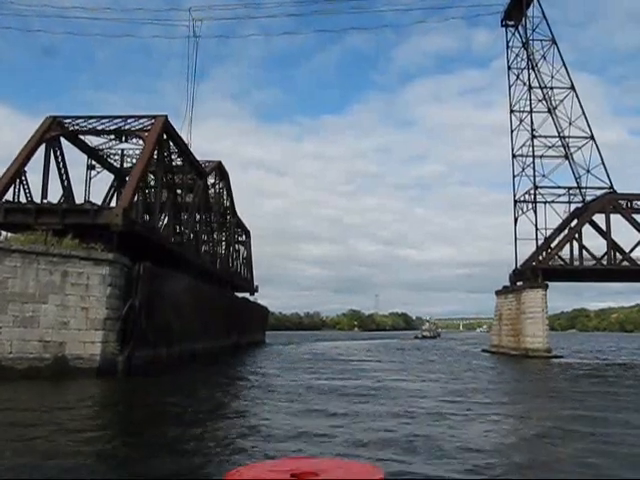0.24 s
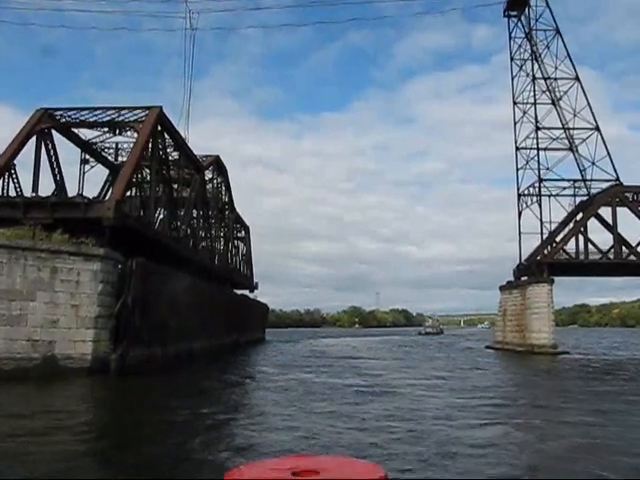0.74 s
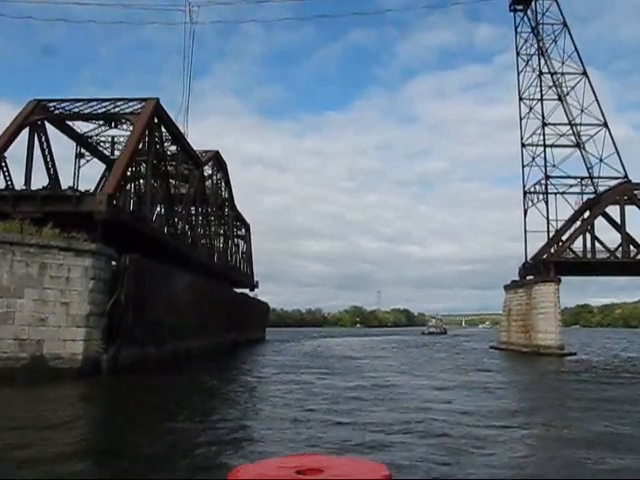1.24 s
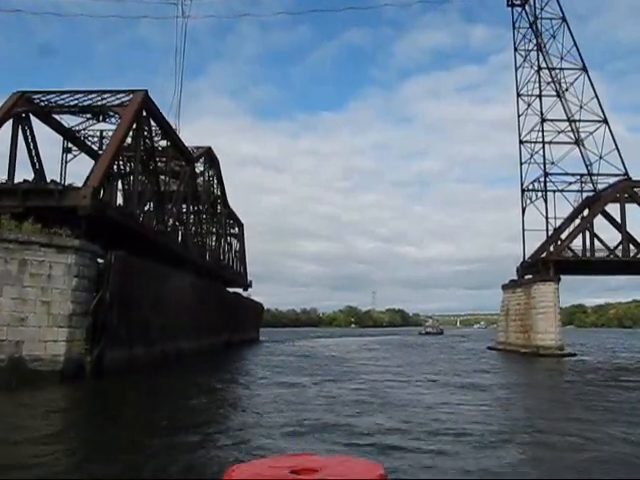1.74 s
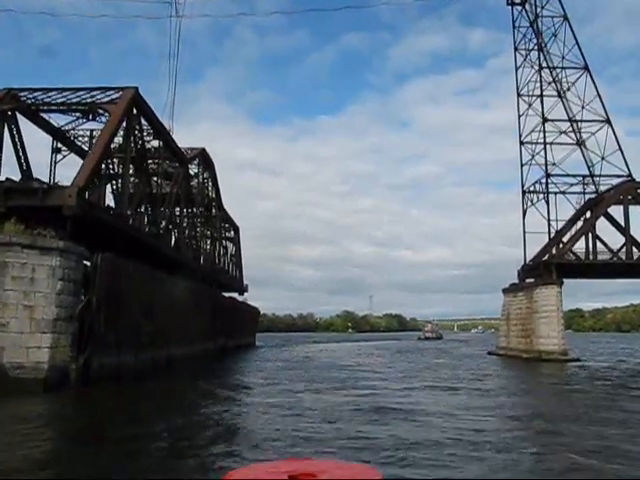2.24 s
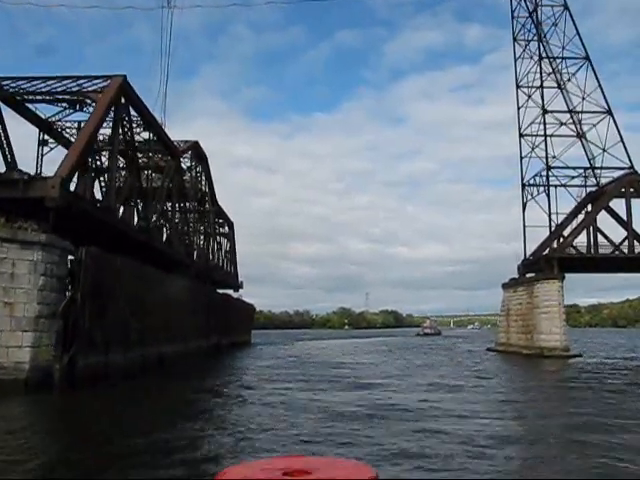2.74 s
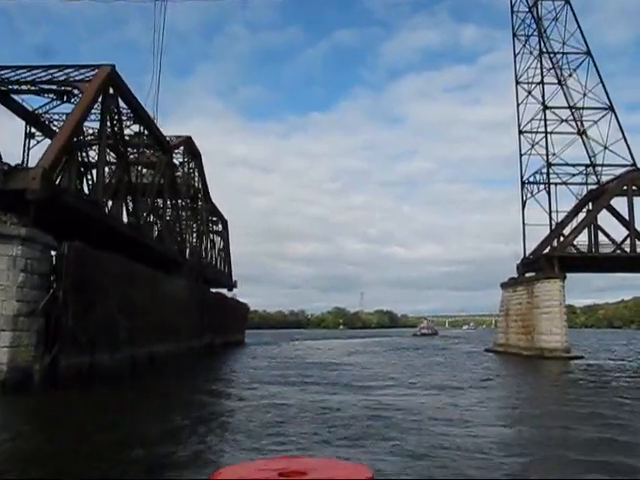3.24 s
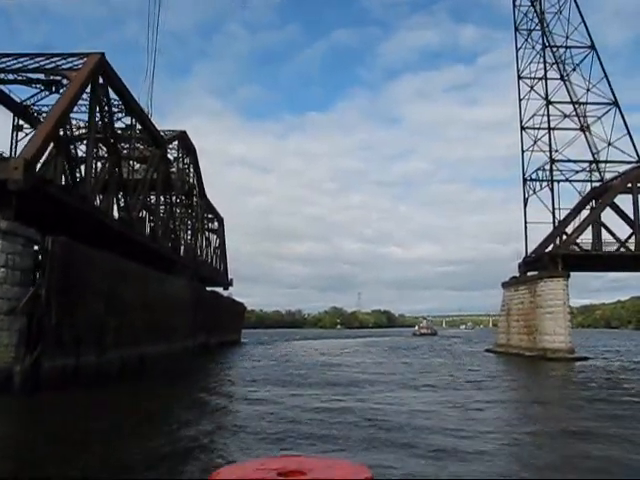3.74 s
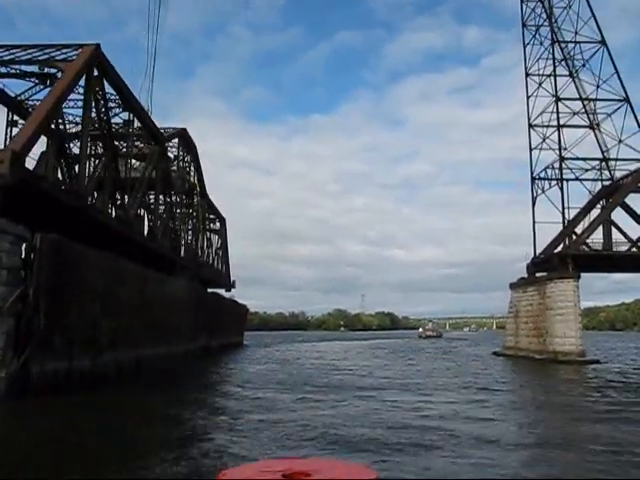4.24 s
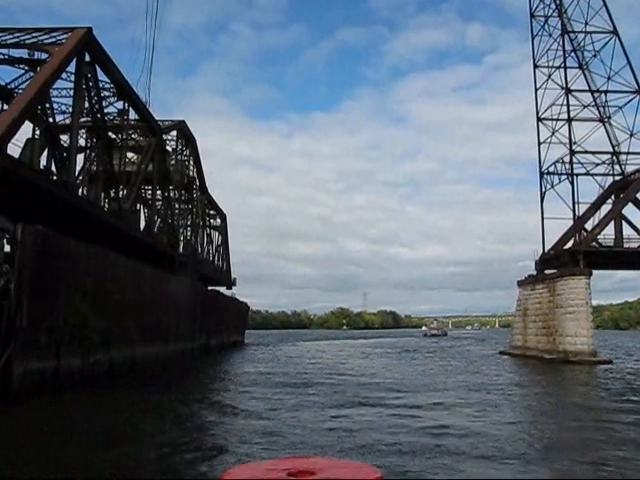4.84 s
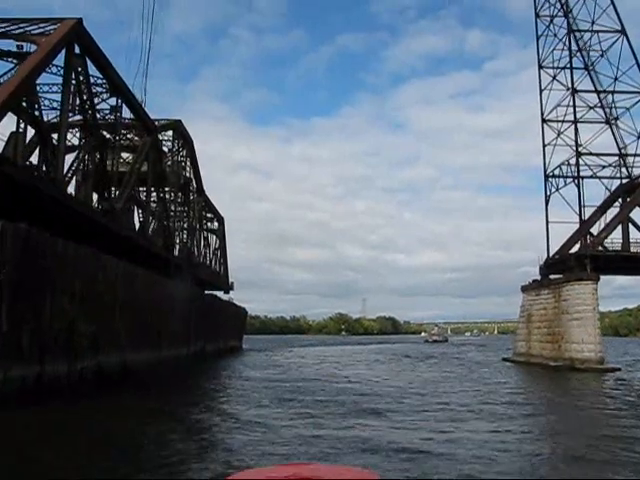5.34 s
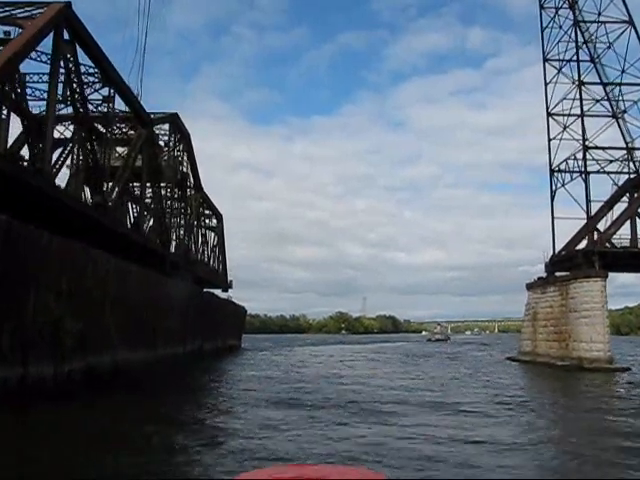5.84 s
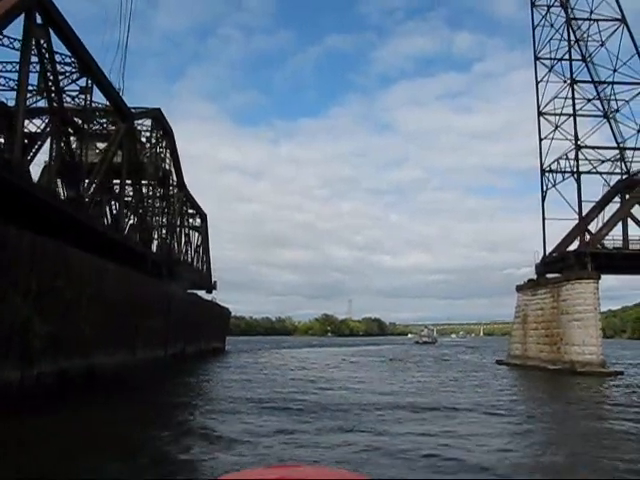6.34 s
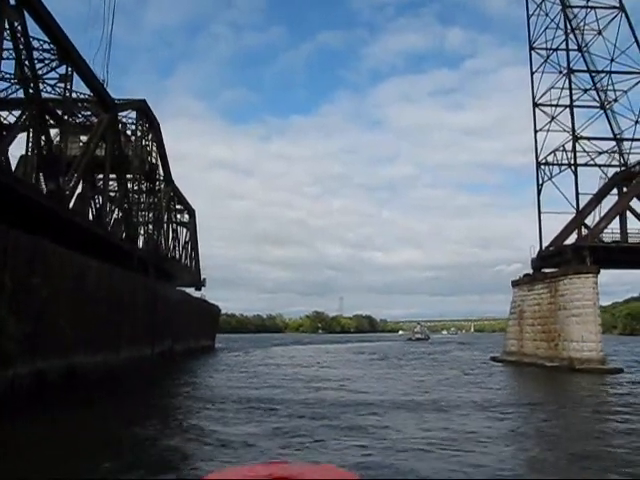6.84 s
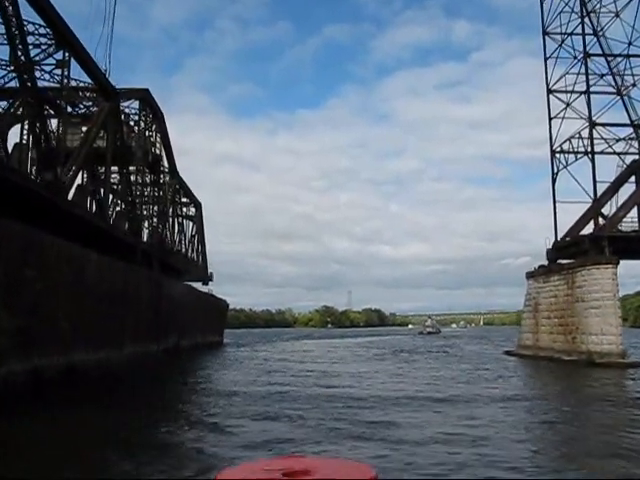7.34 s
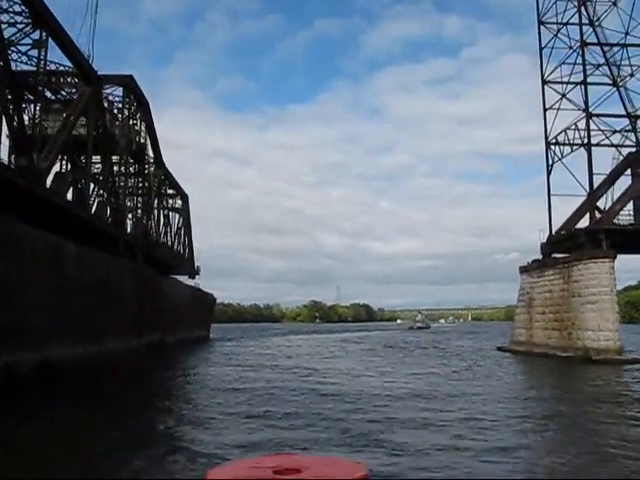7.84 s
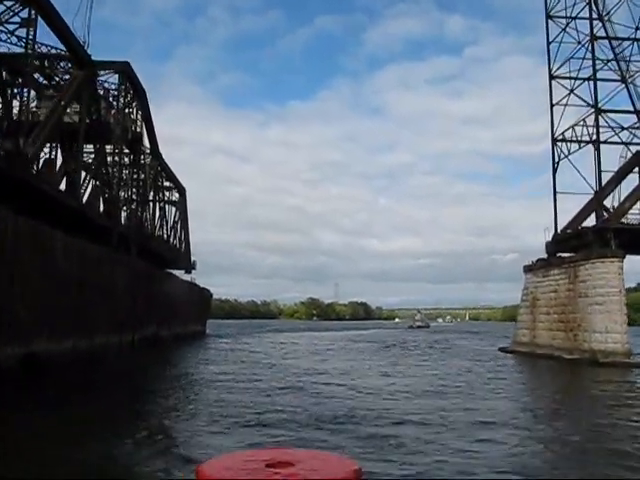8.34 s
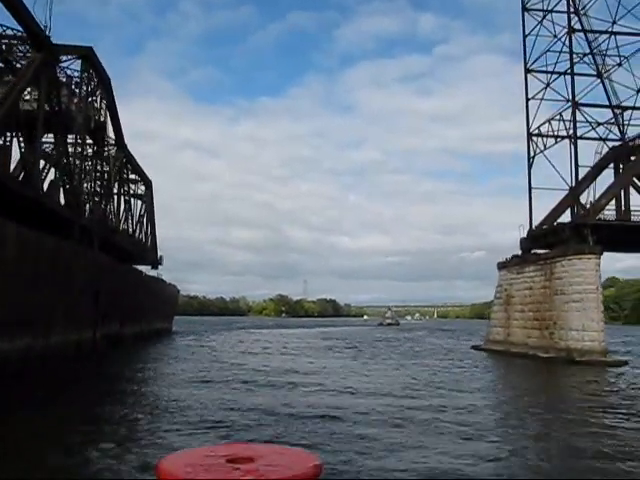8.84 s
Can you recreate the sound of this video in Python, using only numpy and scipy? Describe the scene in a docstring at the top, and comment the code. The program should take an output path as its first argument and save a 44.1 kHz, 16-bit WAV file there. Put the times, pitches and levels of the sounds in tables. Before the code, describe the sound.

Wind roars on a microphone at the bow of a moving boat for the whole nine seconds, low and blustery with a thin fizz in the treble. Gusts swell and break away abruptly, often several times a second. Beneath them the engine and hull make a low, throbbing rumble, and water washes faintly and evenly along the bow. Irregular thumps hit the microphone right at the start and again from about 1 to 2.3 seconds, with a sharp crackle near 1.8 seconds. From about 3 to 7 seconds the air is choppier, and the thumps come thick and fast with short rasps and crackles, densest from 4 seconds on. After about 7.3 seconds the buffeting thins out to scattered thumps, while stronger gusts rise near 7.7 and 8.1 seconds. The wind and rumble carry on to the end.

```python
"""Gusting wind roars on a camera at the bow of a moving boat, over a rumble of engine and hull and a faint
wash of water. The gusts build and break away from the housing. Eddies thump the microphone port and the
sharpest ones crackle, most of all beside a bridge pier. A sample-and-hold at a quarter of the rate
mirrors the roar into a thin fizz in the treble."""
import sys
import numpy as np
from scipy import signal
from scipy.fft import rfft, irfft
from scipy.io import wavfile

SR = 44100
rng = np.random.default_rng(int(sys.argv[2]) if len(sys.argv) > 2 else 0)


def persist_wave(psi):
    """Save psi, clipped to +-1, as 16-bit WAV."""
    counts = np.round(np.clip(psi, -1, 1) * 32767).astype(np.int16)
    wavfile.write(sys.argv[1], SR, np.atleast_2d(counts).T)


N = 401310
TIME = np.arange(N) / SR


def amp(db):
    """Decibels to gain."""
    return 10 ** (np.asarray(db) / 20)


def unit_rms(x):
    """Scales to rms 1."""
    return x / np.sqrt(np.mean(x ** 2) + 1e-20)


def curve(table, at_s=TIME):
    """Linear interpolation of (seconds, value) rows."""
    return np.interp(at_s, *np.transpose(table))


def smooth(x, span_s):
    """Running mean under a Hann window."""
    window = signal.windows.hann(int(span_s * SR))
    return signal.fftconvolve(x, window / window.sum(), "same")


def colour(x, spectrum):
    """Filters x by (Hz, dB) rows, joined on a log frequency axis."""
    hz, db = np.transpose(spectrum)
    bins_hz = np.fft.rfftfreq(len(x), 1 / SR)
    gain_db = np.interp(np.log(bins_hz + 1), np.log(hz), db)
    return irfft(rfft(x) * amp(gain_db), len(x))


def low_pass(x, hz):
    """Steep FIR low-pass."""
    return signal.oaconvolve(x, signal.firwin(511, hz, window=("kaiser", 9), fs=SR), "same")


def flutter(rate_hz):
    """Random wavering of rms 1, rolled off above rate_hz."""
    bins_hz = np.fft.rfftfreq(N, 1 / SR)
    return unit_rms(irfft(rfft(rng.standard_normal(N)) / (1 + (bins_hz / rate_hz) ** 2), N))


def steady_noise(spectrum, span_s):
    """Coloured noise, levelled over spans longer than span_s."""
    noise = colour(rng.standard_normal(N), spectrum)
    return noise / np.sqrt(smooth(noise ** 2, span_s) + 1e-12)


def burst(spectrum, pitch_ratio, length_s, spikiness, samples=8192):
    """Noise under a Gaussian envelope; spikiness above 1 breaks it into snaps."""
    t = (np.arange(samples) - samples // 2) / SR
    envelope = np.exp(-.5 * (2 * t / max(length_s, .001)) ** 2)
    noise = rng.standard_normal(samples)
    spikes = np.sign(noise) * abs(noise) ** spikiness
    swings = colour(spikes * envelope, [(hz * pitch_ratio, db) for hz, db in spectrum])
    return unit_rms(swings) * np.sqrt(np.mean(envelope ** 2))


def add_centred(mix, centre_s, sound):
    """Mixes a sound in around centre_s."""
    at = round(centre_s * SR) - len(sound) // 2 + np.arange(len(sound))
    inside = (at >= 0) & (at < N)
    mix[at[inside]] += sound[inside]


# Each row: breakaway time in seconds, relative peak level in dB, build-up in seconds.
GUST_PEAKS = [(0.55, -40, .35), (0.975, -38, 0.49), (1.28, -42.5, 0.29), (1.57, -37, 0.16),
              (1.81, -39.5, 0.35), (2.06, -41.5, 0.2), (2.31, -43, 0.2), (2.9, -38, 0.43),
              (3.12, -38.5, 0.35), (3.7, -39, 0.26), (3.85, -42.5, 0.086), (4.03, -41.5, 0.14),
              (4.26, -43.5, 0.35), (4.49, -42, 0.06), (4.84, -41, 0.12), (5.37, -39, 0.18),
              (5.58, -39.5, 0.15), (6.32, -45.5, 0.67), (7.17, -41.5, 0.67), (7.68, -36, 0.1),
              (8.141, -37.5, 0.58), (8.47, -39, 0.23), (9.02, -39.5, .45)]


def gusts(lull_db=-47.5, usual_db=-41, build_db=5.5, fall_db_per_s=249):
    """Gusts build on a steady headwind, then break away. Returns dB above the usual flow."""
    power = amp(lull_db) ** 2
    for break_s, peak_db, build_s in GUST_PEAKS:
        before_s = np.maximum(break_s - TIME, 0)
        after_s = np.maximum(TIME - break_s, 0)
        power += amp(peak_db - build_db * (before_s / build_s) ** 2 - fall_db_per_s * after_s) ** 2
    return 10 * np.log10(power) - usual_db


# Housing resonances. Each row: frequency in Hz, relative level in dB.
ROAR_SPECTRUM = [(40, -17.5), (150, 1), (240, -0.5), (290, 2.5), (365, -7.5), (520, -6.5), (750, -10.5),
                 (1050, -16), (1430, -15), (1750, -21), (2600, -28), (3600, -33.5), (5400, -37.5)]


def airflow(gust_db, level_db=-26.0, flutter_db=0.88, brightening=0.041):
    """The stream roars through the housing's broad resonances, brighter as it speeds up."""
    roar = steady_noise(ROAR_SPECTRUM, span_s=0.059)
    body = low_pass(roar, hz=900)
    rush = (roar - body) * amp(brightening * gust_db)
    return (body + rush) * amp(gust_db + level_db + flutter_db * flutter(rate_hz=35))


# Low bluster. Each row: frequency in Hz, relative level in dB.
BLUSTER_SPECTRUM = [(8, -12), (28, -18), (45, -6), (70, 0.5), (115, 2), (190, 5), (290, -5.5), (420, -6.5),
                    (800, -24.5), (2000, -36), (5400, -54)]


def turbulence(gust_db, thumps, level_db=-29.0, follow=1.23, cap_db=3, wake_db=-4.0, flutter_db=3.5):
    """Large slow eddies bluster, growing with the gusts up to a cap and welling up around each thump."""
    stream = amp(level_db + follow * np.minimum(gust_db, cap_db))
    wake = amp(wake_db) * np.sqrt(abs(smooth(thumps ** 2, span_s=0.096)))
    bluster = steady_noise(BLUSTER_SPECTRUM, span_s=0.06)
    return bluster * np.hypot(stream, wake) * amp(flutter_db * flutter(rate_hz=25))


# Hull resonances. Each row: frequency in Hz, relative level in dB.
HULL_SPECTRUM = [(25, -15), (44, -0.5), (53, -8), (60, -0.5), (68, 4.5), (78, -8), (110, -8.5),
                 (300, -59.5)]
# Hull rumble. Each row: time in seconds, level in dB before gusts and throb.
RUMBLE_LEVELS = [(0.0, -15), (0.15, -27.0), (0.4, -23), (2.0, -24), (2.15, -28.5), (2.4, -22), (2.5, -35),
                 (2.6, -22.5), (3.9, -25), (4.05, -19.5), (4.2, -27), (4.45, -22.5), (5.1, -20),
                 (5.2, -31.5), (5.3, -23), (6.25, -24.5), (8.05, -21.5), (8.25, -31.5), (8.35, -21.5),
                 (9.09, -27)]


def hull_rumble(gust_db, follow=0.74, throb_db=1.1):
    """Engine and water drum in the hull: a narrow, throbbing rumble that swells with the gusts."""
    rumble = steady_noise(HULL_SPECTRUM, span_s=0.12)
    return rumble * amp(curve(RUMBLE_LEVELS) + follow * gust_db + throb_db * flutter(rate_hz=8))


def bow_wash(level_db=-48):
    """Water washes faintly and evenly along the bow."""
    spectrum_hz_db = [(100, 5.5), (1000, 0), (2500, -7.5), (5400, -7.5), (8000, -30)]
    return amp(level_db) * unit_rms(colour(rng.standard_normal(N), spectrum_hz_db))


# One eddy's thump. Each row: frequency in Hz before pitch shift, relative level in dB.
EDDY_SPECTRUM = [(15, -21), (70, -1), (170, -0.5), (300, -1), (500, -6), (780, -12.5), (1200, -23),
                 (2000, -41), (3800, -44.5), (5400, -86)]


def eddy(length_s, hardness, usual_s=0.013):
    """A few rough swings of pressure; small or hard eddies sound higher."""
    pitch_ratio = hardness * (usual_s / length_s) ** 0.21
    return burst(EDDY_SPECTRUM, pitch_ratio, 0.85 * length_s, spikiness=2.28)


# Choppy air. Each row: time in seconds, small eddies per second at full flow.
CHOP_RATES = [(0, 4.4), (2.9, 2.87), (4.1, 18.6), (6.8, 22), (7.3, 3), (9.1, 4.7)]


def choppiness(at_s=TIME, usual_per_s=8):
    """Small-eddy rate over its usual value; highest alongside the pier."""
    return curve(CHOP_RATES, at_s) / usual_per_s


# Each row: centre time in seconds, relative level in dB, nominal length in seconds.
STRONG_EDDIES = [(0.017, -21, 0.027), (0.06, -16, 0.017), (0.166, -18.5, 0.025), (0.215, -15.5, 0.022),
                 (0.985, -20, 0.025), (1.124, -19, 0.022), (1.202, -15, 0.01), (1.252, -17.5, 0.032),
                 (1.287, -17, 0.015), (1.58, -19, 0.0056), (1.659, -13, .012), (1.818, -17, 0.019),
                 (1.854, -11, 0.0077), (1.998, -17.5, 0.015), (2.052, -15, 0.032), (2.312, -10, 0.0043),
                 (2.919, -19, 0.016), (2.956, -20, 0.01), (3.13, -14.5, 0.015), (3.219, -16, 0.0099),
                 (3.263, -14, .0065), (3.331, -17.5, .009), (3.432, -18, 0.0061), (3.461, -16, 0.005),
                 (3.486, -17, 0.017), (3.576, -22.5, 0.065), (3.635, -20, 0.028), (3.674, -16.5, 0.018),
                 (3.708, -17, 0.0036), (3.848, -26, 0.029), (3.874, -17, 0.011), (4.042, -17.5, .02),
                 (4.08, -21, 0.02), (4.157, -12.5, .008), (4.213, -19.5, .015), (4.268, -13.5, 0.0062),
                 (4.498, -18, 0.032), (4.572, -14, 0.022), (4.703, -17, 0.012), (4.772, -19, 0.013),
                 (4.8, -21, 0.024), (4.832, -17.5, 0.025), (4.875, -15, 0.011), (4.941, -15, 0.011),
                 (5.047, -18.5, 0.032), (5.362, -15, 0.0093), (5.5, -20, 0.011), (5.59, -14.5, 0.0098),
                 (5.652, -18, 0.019), (5.685, -16, 0.0075), (5.794, -16.5, 0.021), (5.891, -13.5, 0.0065),
                 (5.92, -17, 0.011), (6.043, -18, 0.0089), (6.072, -18, 0.0084), (6.118, -18, 0.034),
                 (6.254, -16.5, 0.018), (6.324, -19.5, .012), (6.337, -13.5, 0.006), (6.481, -17.5, 0.019),
                 (6.589, -13.5, 0.005), (6.617, -18, .016), (6.662, -19, 0.014), (6.783, -19.5, 0.038),
                 (6.966, -17, 0.026), (7.035, -19, 0.016), (7.078, -14.5, 0.0048), (7.123, -19, 0.026),
                 (7.16, -14.5, 0.012), (7.335, -21.5, 0.029), (7.712, -15.5, 0.014), (7.75, -20, 0.012),
                 (7.862, -16.5, 0.007), (8.143, -15.5, 0.014), (8.548, -12, 0.0054), (8.726, -18.5, 0.033),
                 (8.873, -20, 0.037), (9.02, -13.5, 0.0077)]


def buffets(gain_db=1):
    """Strong eddies thump the port, harder in choppy air."""
    out = np.zeros(N)
    for centre_s, db, length_s in STRONG_EDDIES:
        hardness = choppiness(centre_s) ** 0.042
        add_centred(out, centre_s, amp(db + gain_db) * eddy(length_s, hardness))
    return out


# Air tearing at the port. Each row: frequency in Hz before any pitch shift, relative level in dB.
PORT_SPECTRUM = [(200, 11.5), (900, 17.5), (1600, 11), (2400, 5.5), (3000, 10), (3800, 4), (4600, -1),
                 (5400, -7.5)]


def rasp(pressure, level_db=-32, full_swing=0.23, ragged_db=5):
    """Air rasps in the port at the crest of each large pressure swing, louder in choppy air."""
    hiss = colour(rng.standard_normal(N), PORT_SPECTRUM)
    spits = unit_rms(hiss * amp(ragged_db * np.minimum(flutter(rate_hz=200), 2)))
    crests = np.tanh(abs(pressure) / full_swing) ** 3.1
    return amp(level_db) * spits * crests * choppiness() ** .35


def crackle(length_s, hz, usual_hz=2950):
    """An eddy tears at the port's edge: a tight cluster of uneven snaps."""
    return burst(PORT_SPECTRUM, hz / usual_hz, 0.58 * length_s, spikiness=3.3)


def spatter(gain_db=-22.5, scatter_s=0.015, spread_db=2):
    """In choppy air a strong eddy breaks into a few faint spits around its thump."""
    out = np.zeros(N)
    for centre_s, db, _ in STRONG_EDDIES:
        count = rng.poisson(.13 * curve(CHOP_RATES, centre_s))
        for lag, size in rng.standard_normal((count, 2)):
            spit = amp(db + gain_db + spread_db * size) * crackle(length_s=0.0059, hz=2900)
            add_centred(out, centre_s + scatter_s * lag, spit)
    return out


def stalls(depth_db=2.5, half_width_s=0.031, lag_s=0.045):
    """The stream lets go in the lee of each strong eddy. Returns the dip in dB."""
    dip = np.zeros(N)
    window = signal.windows.hann(int(2 * half_width_s * SR))
    for centre_s, _, length_s in STRONG_EDDIES:
        add_centred(dip, centre_s + length_s / 2 + lag_s, window)
    return -depth_db * np.minimum(dip, 1)


# Each row: centre time in seconds, relative level in dB, nominal length in seconds, treble peak in Hz.
SHARP_EDDIES = [(0.159, -33, 0.0038, 3000), (1.192, -34.5, 0.0047, 2800), (1.246, -37, .008, 2880),
                (1.264, -34, 0.0024, 2600), (1.58, -31.5, 0.0084, 2400), (1.738, -28, 0.0025, 2820),
                (1.811, -24, 0.0022, 2380), (2.041, -33.5, 0.0073, 3000), (2.054, -28.5, 0.0024, 2750),
                (3.134, -32, 0.0023, 2700), (3.208, -32.5, .005, 2400), (3.88, -41, 0.02, 3220),
                (4.224, -27.5, 0.009, 2200), (4.272, -29, 0.003, 2500), (4.482, -33.5, 0.011, 3330),
                (4.577, -29.5, 0.0077, 3410), (4.71, -35.5, .003, 3400), (4.777, -29, 0.0047, 3000),
                (4.949, -39, 0.011, 3000), (4.997, -30.5, 0.0047, 2760), (5.058, -36, 0.0056, 2800),
                (5.369, -34, .008, 3100), (5.923, -38, 0.011, 3012), (6.048, -27, 0.0024, 2460),
                (6.112, -36.5, 0.013, 2880), (6.153, -26.5, 0.0027, 2635), (6.252, -31.5, 0.0091, 2600),
                (6.281, -33, 0.002, 3500), (6.505, -34, 0.0051, 2900), (6.59, -29.5, 0.002, 3520),
                (6.61, -33, .006, 2400), (6.619, -26, 0.0022, 2780), (6.666, -35.5, 0.019, 3450),
                (6.753, -29.5, 0.0031, 3400), (6.966, -31, 0.0046, 3730), (7.083, -30, 0.0028, 3330),
                (7.159, -35, 0.01, 3150), (7.175, -30.5, 0.0027, 3520), (7.867, -38, .005, 4070),
                (8.15, -34, .005, 3380), (8.545, -31.5, 0.0058, 2763)]


def crackles(gain_db=8.0):
    """The sharpest eddies crackle at the port."""
    out = np.zeros(N)
    for centre_s, db, length_s, hz in SHARP_EDDIES:
        add_centred(out, centre_s, amp(db + gain_db) * crackle(length_s, hz))
    return out


def small_eddies(gust_db, flap_db=-26.5, snap_db=-41, follow=.22, spread_db=2):
    """Small eddies ride the gusts and thin out in the lulls, each a light flap with a faint snap."""
    out = np.zeros(N)
    rate_per_s = curve(CHOP_RATES) * np.minimum(amp(gust_db) ** 2, 1)
    for at in np.flatnonzero(rng.random(N) < rate_per_s / SR):
        flap_gain, snap_gain = amp(follow * gust_db[at] + spread_db * rng.standard_normal(2))
        flap = flap_gain * amp(flap_db) * eddy(length_s=0.01, hardness=1.18)
        snap = snap_gain * amp(snap_db) * crackle(length_s=0.011, hz=2800)
        add_centred(out, TIME[at], flap + snap)
    return out


def scene():
    """Wind, hull and water at one microphone."""
    gust_db = gusts() + stalls()
    thumps = buffets()
    stream = airflow(gust_db) + turbulence(gust_db, thumps)
    port = thumps + rasp(thumps) + crackles()
    boat = hull_rumble(gust_db) + bow_wash()
    return (stream + port + boat + small_eddies(gust_db) + spatter())[None]


def record(dry, ceiling=.68, hold_samples=4, edge_hz=15700):
    """Soft overload, a sample-and-hold that mirrors the sound into the treble, then a band limit."""
    squeezed = dry[0] / (1 + (dry[0] / ceiling) ** 4) ** (1 / 4)
    decimated = low_pass(squeezed, SR / hold_samples / 2)[::hold_samples]
    stepped = np.repeat(decimated, hold_samples)[:N]
    return low_pass(stepped, edge_hz)[None]


dry = scene()
out = record(dry)
persist_wave(out)
```